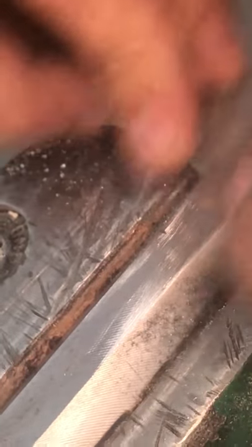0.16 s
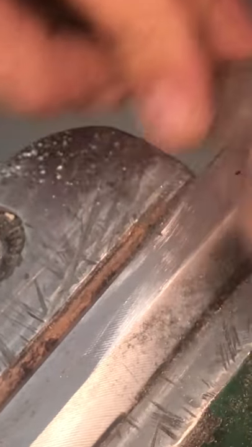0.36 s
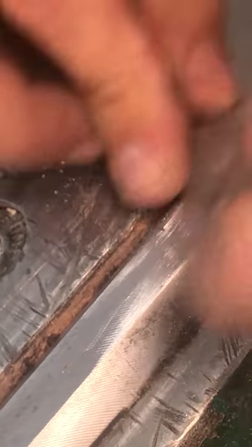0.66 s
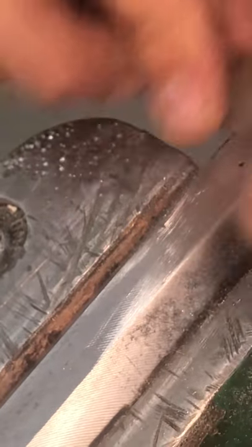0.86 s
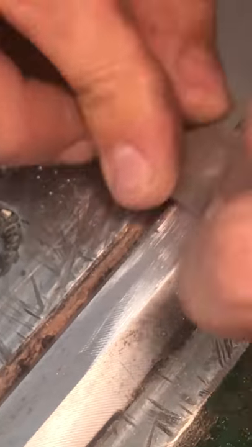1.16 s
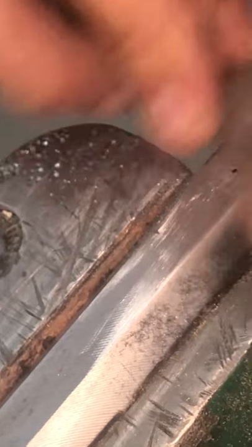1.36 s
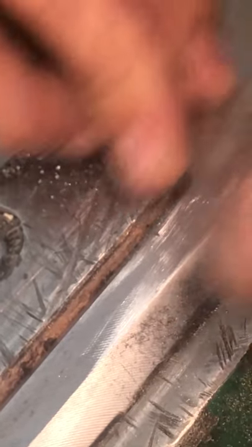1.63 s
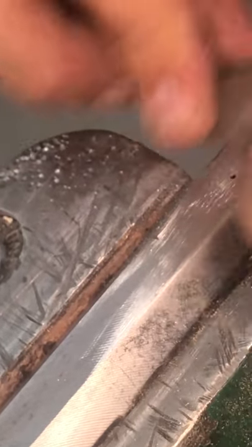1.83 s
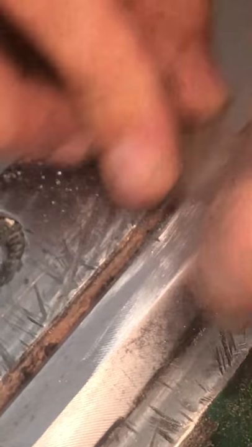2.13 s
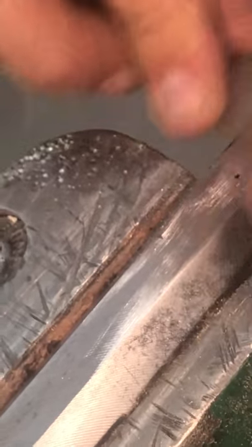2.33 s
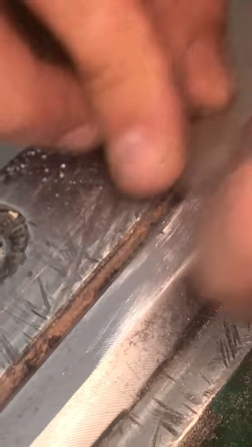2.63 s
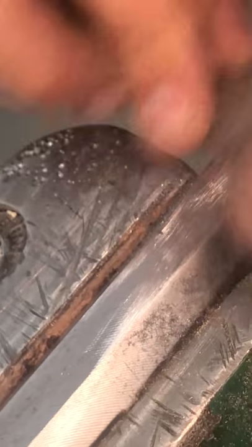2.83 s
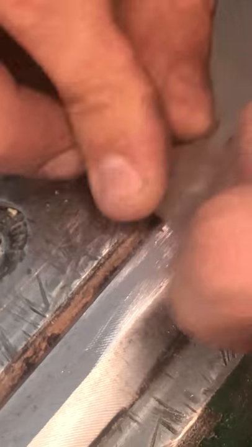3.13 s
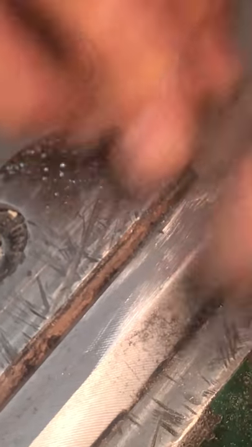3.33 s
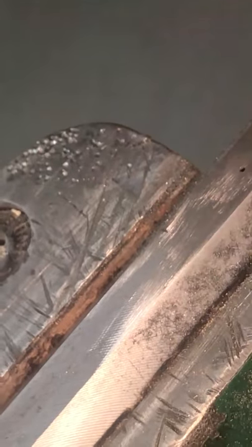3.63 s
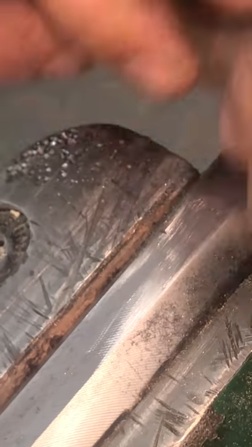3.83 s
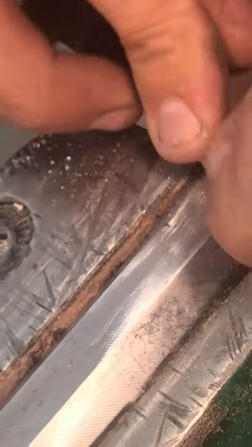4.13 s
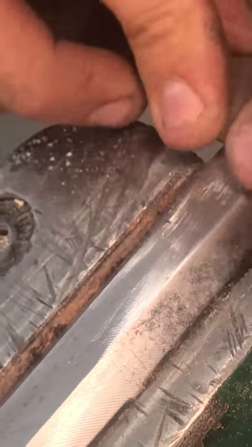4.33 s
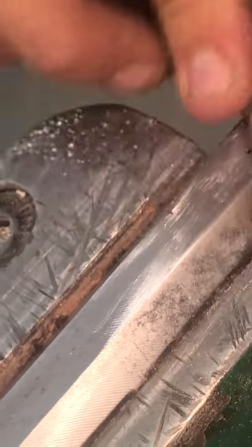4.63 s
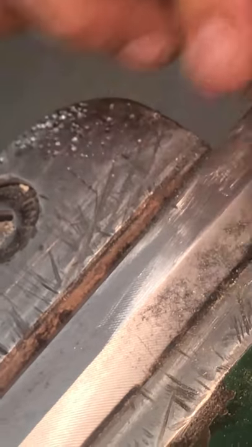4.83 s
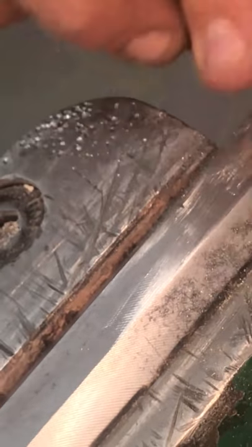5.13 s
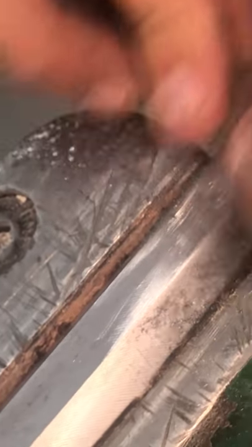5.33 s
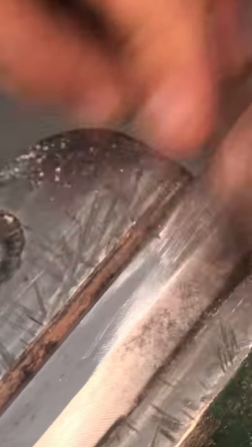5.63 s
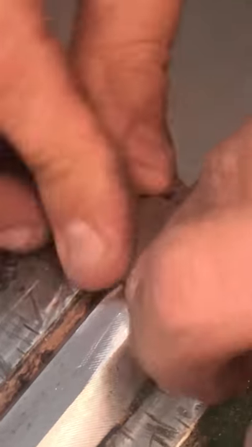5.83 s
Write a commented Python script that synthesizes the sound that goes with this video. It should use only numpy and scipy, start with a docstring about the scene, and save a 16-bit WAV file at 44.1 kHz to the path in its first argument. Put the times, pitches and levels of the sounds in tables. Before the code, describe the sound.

In a small workshop with low fan noise, a hand file scrapes steel in quick alternating push and pull strokes, gritty and bright. After three and a half seconds it slips off with a light clatter; a hard metallic click-clack marks its return, followed by a quiet rub and renewed filing. Close microphone, little reverberation, centred image.

```python
"""Rasping strokes, about eight a second: a short file is worked back and forth on a steel barrel in a vice.
It runs off the work, knocks, is set down again with a sharp double clack, and the filing resumes with a new grip.
Random tooth bites excite the resonances of file and barrel; blows set off clatter and decaying modes; friction
noise makes the slide. A faint high whistle, a gliding sine, moves separately up and back.
Behind them filtered noise and a hum make a fan in a small workshop."""
import sys
import numpy as np
from scipy import signal
from scipy.fft import rfft, irfft
from scipy.io import wavfile

SR = 44100
rng = np.random.default_rng(int(sys.argv[2]) if len(sys.argv) > 2 else 0)


def transcribe(signal):
    """Save signal, clipped to [-1, 1], as a 16-bit WAV file at the path in sys.argv[1]."""
    frames = np.atleast_2d(signal).T
    limited = np.clip(frames, -1, 1)
    pcm = np.round(limited * 32767).astype(np.int16)
    wavfile.write(sys.argv[1], SR, pcm)


N = 264021
TIME = np.arange(N) / SR   # [s]
LIFT_S, REGRIP_S = 3.563, 4.0   # no stroke cuts between these moments


def from_db(db):
    """Decibels to amplitude: 20 dB is a factor of ten."""
    return 10 ** (np.asarray(db) / 20)


def rms_one(x):
    """Normalization to unit mean power."""
    return x / np.sqrt(np.mean(x ** 2) + 1e-20)


def drift(rate):
    """Slow random fluctuation of unit spread: noise through two equal low-pass poles at `rate` Hz."""
    step = 40   # samples between slow values
    pole = np.exp(-2 * np.pi * rate * step / SR)
    settle = 2000
    noise = rng.standard_normal(N // step + 2 + settle)
    slow = signal.lfilter([1], [1, -2 * pole, pole * pole], noise)[settle:]
    return np.interp(np.arange(N) / step, np.arange(len(slow)), rms_one(slow))


def resonate(x, hz, width):
    """Steep-sided resonance of gain about 1 at its peak: two equal two-pole sections, each `width` Hz wide."""
    radius = np.exp(-np.pi * width / SR)
    gain = (1 - radius * radius) / 2
    section = [gain, 0, -gain, 1, -2 * radius * np.cos(2 * np.pi * hz / SR), radius * radius]
    return signal.sosfilt([section] * 2, x + 1e-18)


def ring(clicks, hz, t60):
    """Impulse response of a damped mode: a unit click starts a decaying sine of initial height 1."""
    radius = np.exp(-np.log(1000) / (t60 * SR))
    angle = 2 * np.pi * hz / SR
    poles = [1, -2 * radius * np.cos(angle), radius * radius]
    return signal.lfilter([0, np.sin(angle)], poles, clicks + 1e-18)


def dying(s, t60):
    """Exponential decay: an envelope that jumps to 1 at time s and falls 60 dB in t60 seconds."""
    return (TIME >= s) * np.exp(-np.log(1000) * np.clip((TIME - s) / t60, 0, 2))


def fan():
    """Broadband flow noise, a mains hum and narrow-band noise for the wavering tones of the housing."""
    # spectrum of the workshop air: (frequency [Hz], relative density [dB per Hz])
    air_spectrum = [(25, -26.5), (38, -17), (55, -7), (85, -9), (140, -3.5), (200, -5), (300, -2),
                    (480, -0.5), (560, -6), (690, -3), (780, -7.5), (1000, -8), (2000, -15.5),
                    (5000, -26.5), (15000, -40.5)]
    # tones of the housing: (frequency [Hz], half the width of each filter section [Hz], level [dB])
    housing_tones = [(161.6, 4.5, -65), (229.9, 6, -71.5), (288.6, 3.4, -69), (364, 4.5, -67.5),
                     (413.6, 4.5, -65), (487, 16, -68), (658.4, 41, -64.5), (709, 3.1, -72.5),
                     (726.6, 1.6, -63.5), (964, 8.1, -73)]
    air_db, hum_hz, hum_db = -55, 120, -62

    hz, db = np.transpose(air_spectrum)
    bins = np.maximum(np.arange(N // 2 + 1) * SR / N, 1)
    shape = from_db(np.interp(np.log(bins), np.log(hz), db))
    air = irfft(rfft(rng.standard_normal(N)) * shape, N)

    tones = np.zeros(N)
    for f, half_width, level in housing_tones:
        settled = resonate(rng.standard_normal(N + SR), f, 2 * half_width)[SR:]
        tones += from_db(level) * rms_one(settled)

    hum_level = np.sqrt(2) * from_db(hum_db + 1.5 * drift(1.5))
    hum = hum_level * np.sin(2 * np.pi * hum_hz * TIME + 0.18 * drift(3))
    return from_db(air_db) * rms_one(air) + tones + hum


def workshop(x):
    """Reverberation by feedback combs: twelve wall echoes dull on every round and are scattered by all-passes."""
    t60_s, wall_cut_hz = 0.56, 12100
    out = np.zeros(N)
    dull = np.exp(-2 * np.pi * wall_cut_hz / SR)
    lags = (np.geomspace(.011, .047, 12) * SR).astype(int)   # 11 to 47 ms
    for k, lag in enumerate(lags):
        loop, state = x.copy(), [0.]
        gain = np.exp(-np.log(1000) * lag / SR / t60_s)
        for i in range(lag, N, lag):
            back, state = signal.lfilter([gain * (1 - dull)], [1, -dull], loop[i - lag:i], zi=state)
            loop[i:i + lag] += back[:N - i]
        out += (loop - x) * (-1) ** k
    # the clutter scatters: all-passes spread the echoes in time
    for lag in (67, 173):
        taps = np.r_[.6, np.zeros(lag - 1), 1]
        out = signal.lfilter(taps, taps[::-1], out)
    return out / 2


def bench(x, echo_db):
    """Comb filtering by interference: quick reflections off hands, vice and bench join the direct sound."""
    lags = (rng.uniform(.002, .014, 6) * SR).astype(int)
    echoes = sum(np.pad(x, (lag, 0))[:N] * (-1) ** k for k, lag in enumerate(lags))
    return x + from_db(echo_db) * echoes


def whistle():
    """Frequency modulation: the summed instantaneous frequency drives a faint sine that glides up and back."""
    # glide: (time [s], mean frequency [Hz], mean peak level [dB])
    whistle_glide = [(3.88, 11800, -100), (3.96, 13040, -80), (4.05, 13900, -92), (4.17, 14900, -82),
                     (4.25, 15900, -88), (4.35, 15900, -88), (4.39, 14800, -82), (4.43, 13200, -100)]
    s, pitch, level = np.transpose(whistle_glide)
    cycles = np.cumsum(np.interp(TIME, s, pitch) * (1 + .004 * drift(60))) / SR
    loudness = from_db(np.interp(TIME, s, level) + 3.0 * drift(40))
    return loudness * np.sin(2 * np.pi * cycles) * (TIME > s[0]) * (TIME < s[-1])


def slide():
    """Friction noise excites resonances as the barely pressed file rubs along the steel."""
    # the file slides lightly into place: (time [s], force level [dB])
    slide_force = [(4.0, -100), (4.06, -53), (4.2, -61), (4.33, -58.5), (4.39, -64), (4.43, -100)]
    # resonances that it rubs: (frequency [Hz], width of each filter section [Hz], level [dB])
    rub_modes = [(2250, 500, 9), (4680, 800, 3.5), (5500, 640, -0.5), (7000, 2500, -7), (12050, 500, -5)]
    force = from_db(np.interp(TIME, *np.transpose(slide_force)))
    rub = np.zeros(N)
    for hz, width, db in rub_modes:
        rub += resonate(force * from_db(db) * rng.standard_normal(N), hz, width)
    return rub


def knocks():
    """Impact excitation: teeth clatter on steel for some milliseconds, then the free modes ring and decay."""
    # steel on steel: (time [s], clatter level [dB], clatter t60 [s], brightness [dB per octave],
    # pitch of the contact [Hz], its relative level [dB], barrel ring level [dB], file ring level [dB])
    blow_table = [(3.559, -42, 0.056, -4, 2270, -36, -69, -43.5),
                  (3.610, -41.5, 0.12, -4.5, 4680, -37.5, -73, -39),
                  (3.987, -22.5, 0.03, -0.5, 4950, -26.5, -52.5, -43.5),
                  (4.004, -17, 0.03, 4.5, 8390, -18.5, -41.5, -52),
                  (4.0105, -26, 0.028, 3, 7070, -27, -59.5, -57)]
    # damped resonances of the contact: (frequency [Hz], width of each filter section [Hz], relative level [dB])
    contact_modes = [(890, 350, -8.5), (1384, 370, -2), (1997, 384, 3.5), (3440, 1100, -7),
                     (4600, 1400, 0.7), (6000, 810, -2.5), (6800, 420, 1.5), (8250, 1100, 0.5),
                     (10300, 2500, -3), (11900, 1100, -5), (14100, 800, -3)]
    # ringing modes: (frequency [Hz], relative level [dB], t60 [s]); the vice quickly damps the barrel's strongest
    barrel_modes = [(848, 7.5, 0.11), (1385, -8.5, 0.38), (1686, -10, .35), (1714, -8.5, .55),
                    (1737, -7, .5), (2024, 10, 0.05), (2175, -9, 0.32), (2290, -8.5, 0.2),
                    (4460, 13.5, .05), (4492, -13, .33), (5922, -15.5, .33), (6115, -14, .35),
                    (6936, 12, .04), (6950, -17.5, .35), (8070, 17.5, .035), (8380, 17.5, .035),
                    (8850, -11, .2), (8842, 9.5, 0.032), (9141, -12.5, 0.26), (9895, -12, .4),
                    (11160, -15, .22), (12400, -14, .17), (13950, 11, 0.036)]
    file_modes = [(950, -10, 0.54), (2280, -14, 0.29), (2640, -9.5, 0.16), (5000, -4.5, 0.14),
                  (6280, -17, .2), (7267, -12, .11), (10080, -23, .2), (11570, -17, 0.25),
                  (13840, -28, .24)]

    s, clatter_db, t60s, tilt, contact_hz, contact_db, barrel_db, file_db = np.transpose(blow_table)
    bursts = np.array([dying(at, t60) for at, t60 in zip(s, t60s)])
    out = np.zeros(N)
    for hz, width, db in contact_modes:
        force = from_db(clatter_db + db + tilt * np.log2(hz / 6000)) @ bursts
        out += resonate(2 * force * rng.choice([-1, 1], N), hz, width)
    # each point of contact favours one pitch
    for burst, hz, db in zip(bursts, contact_hz, contact_db):
        out += resonate(5 * from_db(db) * burst * rng.choice([-1, 1], N), hz, 0.089 * hz)
    for modes, blow_db in ((barrel_modes, barrel_db), (file_modes, file_db)):
        blows = np.zeros(N)
        blows[np.round(s * SR).astype(int)] = from_db(blow_db)
        for hz, db, t60 in modes:
            out += from_db(db) * ring(blows, hz, t60)
    # no low thump under the blows: cut below 600 Hz
    return signal.sosfilt(signal.butter(2, 600, "high", fs=SR, output="sos"), out)


def strokes_of_hand():
    """Reciprocating motion, push (+1) and pull (-1) in turn, with harder pressure giving a brighter cut.

    Yields (start [s], end [s], direction, moment of top speed [share of stroke], level [dB], tilt [dB per octave]).
    """
    # pace of the hand, one list per bout: (time [s], strokes made so far)
    hand_pace = [
        [(-.052, 0), (.425, 4), (.79, 7), (1.147, 10), (1.395, 12), (2.004, 17), (2.378, 20), (2.862, 24),
         (3.596, 30)],
        [(4.409, 0), (4.683, 2), (4.953, 4), (5.208, 6), (5.475, 8), (5.771, 10), (6.06, 12)],
    ]
    # bearing down: (time [s], stroke level [dB], lean: extra on the pull and less on the push [dB])
    hand_pressure = [(0, -43, 0), (.32, -45, -0.5), (1.15, -44.5, -.3), (1.58, -46, 0.2),
                     (2.05, -43.5, 0.5), (2.65, -45.5, 1.1), (3.03, -43, 1.05), (3.36, -43, .1),
                     (3.53, -39, 0), (4.5, -47, -0.1), (4.88, -45, 1.6), (5.08, -45.5, -0.2),
                     (5.4, -43.5, -0.3), (5.85, -39.5, .2)]
    # swing, one row per bout: (a push starts early and ends late by this much [s],
    # moment of top speed [share of stroke], how much earlier it comes per dB of lean [share of stroke])
    hand_swing = [(0.001, .45, 0.15), (-0.0013, 0.5, -0.03)]
    usual_db, usual_tilt = -44.5, .7   # level [dB] and brightness [dB per octave] of a usual stroke
    tilt_per_db, lean_tilt = 0.37, .3   # brightness [dB per octave] per dB of level, and further per dB of lean
    usual_rest_s, rest_s_per_db = 0.027, .002   # rest at each turn: lightly pressed, the file bites later

    pressure_s, pressure_db, lean_db = np.transpose(hand_pressure)
    for pace, (push_longer_s, top_speed_at, earlier_per_db) in zip(hand_pace, hand_swing):
        s, made = np.transpose(pace)
        stroke = np.arange(round(made[-1]) + 1)
        turns = np.interp(stroke, made, s) - push_longer_s * (-1) ** stroke
        for start, end, direction in zip(turns, turns[1:], (-1) ** stroke):
            middle = (start + end) / 2
            pressure = np.interp(middle, pressure_s, pressure_db)
            lean = -direction * np.interp(middle, pressure_s, lean_db)
            level = pressure + lean
            rest = usual_rest_s - rest_s_per_db * (pressure - usual_db)
            bright = usual_tilt + tilt_per_db * (level - usual_db) + lean_tilt * lean
            fastest = top_speed_at - earlier_per_db * lean
            yield start + rest / 2, end - rest / 2, direction, fastest, level, bright


def hand_motion(release, slacken_db):
    """Sinusoidal kinematics: speed rises and falls in each stroke, giving force, direction, place and tilt."""
    force, direction, place, tilt = np.zeros((4, N))
    for start, end, way, fastest, db, bright in strokes_of_hand():
        now = (TIME > start) & (TIME < end)
        share = (TIME[now] - start) / (end - start)
        phase = np.pi * np.interp(share, [0, np.clip(fastest, .1, .9), 1], [0, .5, 1])
        force[now] = from_db(db) * np.sin(phase) ** release
        direction[now] = way
        place[now] = -way * np.cos(phase)
        # as the hand slackens at the end of a stroke the teeth only rub, which is duller
        tilt[now] = bright - slacken_db * (phase / np.pi) ** 6
    return force * ((TIME < LIFT_S) | (TIME > REGRIP_S)), direction, place, tilt


def tooth_bites(per_s, size_db):
    """Shot noise: the teeth tear off tiny chips of random size at random moments."""
    moments = rng.random(N) < per_s / SR
    sizes = from_db(size_db * np.minimum(rng.exponential(1, N), 4))
    return rms_one(moments * sizes)


def filing(first_db, second_db, judder_db, wander_db, pivot_hz):
    """Modal excitation: each bite kicks every resonance, in a mix that shifts as the contact crosses the nodes."""
    # resonances of file and barrel pressed together, for each grip:
    # (frequency [Hz], width of each filter section [Hz], relative level [dB], extra on the push and less on
    # the pull [dB], extra at the far end of the travel and less at the near end [dB])
    first_grip = [(952, 43, -5.5, -3.5, -5.5), (1385, 230, -7, 0.2, -7), (1822, 83, 0.9, -2.4, -0.5),
                  (2010, 200, -2, -0.6, -1.5), (2296, 62, -9, -2, -3.5), (2575, 165, -4, 0.6, -1.5),
                  (2994, 120, -2.5, 0.2, -2.5), (3250, 244, -2, 1, 0), (3634, 470, -4, 0, -0.5),
                  (4300, 630, -2.5, 0.5, -2.2), (4940, 120, -9, 0.5, 4.5), (5660, 670, -3.5, -0.5, -1.5),
                  (6150, 430, 0.3, -0.7, -1.5), (6790, 580, 1.5, -0.8, 3.5), (7334, 430, -0.2, 4.5, -1.5),
                  (8590, 1370, -0.5, -0.4, -1.2), (10170, 580, -2, -2, 1), (10710, 950, -4, 1.5, 6),
                  (11600, 200, -4.5, -5, -3), (11960, 2183, -7, 1.3, 2), (14100, 1303, -4.5, -0.5, -0.5),
                  (15700, 603, -8, 1.5, 4)]
    second_grip = [(950, 120, -7, -2, 1.0), (1250, 61, -10, -0.6, 11), (1467, 110, -7, -1, 0.1),
                   (1820, 290, -2, -0.7, -3), (2004, 106, 3.5, -1, -1), (2317, 160, -1, -0.5, 0.5),
                   (2550, 140, -0.5, 1, -0.5), (3170, 520, -4.5, 1, -3), (3630, 580, -5, 0.3, 3),
                   (4270, 654, -8, -3, 3.5), (4870, 1100, -5, 1, -2.5), (5830, 730, 0.1, -0.1, 0),
                   (6970, 780, 1.5, -0.5, -0.5), (8070, 1100, 0, 1.5, -2), (8900, 1700, -2.5, -2, 0.5),
                   (10300, 530, -2.5, 2, 3), (10900, 648, -6.5, 2.5, 2), (12000, 2000, -4, -0.5, 0.6),
                   (14186, 1819, -4, 0.5, 3.5), (15622, 2000, -8.5, 0, 0.5)]
    # short ticks and sharper stroke onsets, with one faint tick in the pause: (time [s], level [dB], t60 [s])
    short_ticks = [(0.21, -38, .03), (0.244, -38, .045), (0.441, -43.5, 0.047), (0.521, -41, .011),
                   (2.522, -44.5, 0.026), (3.123, -44, .03), (3.497, -40, .03), (3.834, -56, .007),
                   (5.801, -38, 0.036)]

    force, direction, place, tilt = hand_motion(release=1.0, slacken_db=7.0)
    force = force * from_db(judder_db * drift(68))
    tick_power = sum((from_db(db) * dying(s, t60)) ** 2 for s, db, t60 in short_ticks)
    drive = np.sqrt(force ** 2 + tick_power)
    bites = drive * tooth_bites(per_s=18000, size_db=1.5)

    out = np.zeros(N)
    grips = ((first_grip, TIME < REGRIP_S, first_db), (second_grip, TIME >= REGRIP_S, second_db))
    for modes, held, grip_db in grips:
        for hz, width, db, push_db, far_db in modes:
            mix_db = push_db * direction + far_db * place
            mix_db += tilt * np.log2(hz / pivot_hz) + wander_db * drift(13.0)
            strength = rng.standard_normal(held.sum())
            kicks = bites[held] * strength * from_db(grip_db + db + mix_db[held])
            out[held] += resonate(kicks, hz, width)
    return out


def scene():
    """Superposition: steel sounds and whistle, a little reverberation of both, and the fan; same in both ears."""
    strokes = filing(first_db=5.5, second_db=4.5, judder_db=0.9, wander_db=1.6, pivot_hz=7320)
    close = bench(strokes, echo_db=-20.5) + knocks() + slide() + whistle()
    room = from_db(-26) * workshop(close)
    return np.tile(close + room + fan(), (2, 1))


def record(dry):
    """Band limiting: a steep elliptic low-pass cuts the top above 15720 Hz."""
    return signal.sosfilt(signal.ellip(10, .1, 70, 15720, fs=SR, output="sos"), dry)


dry = scene()
out = record(dry)
transcribe(out)
```